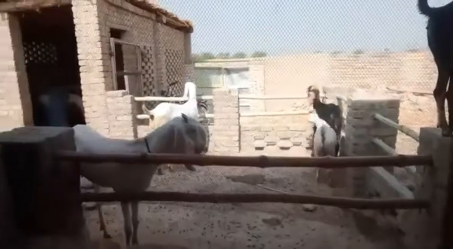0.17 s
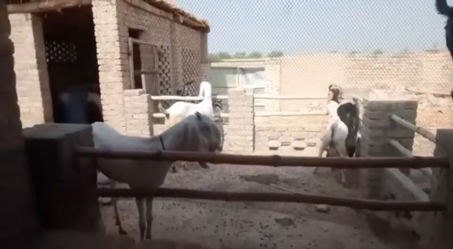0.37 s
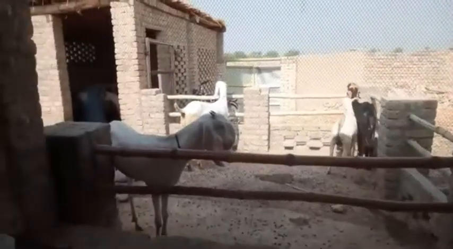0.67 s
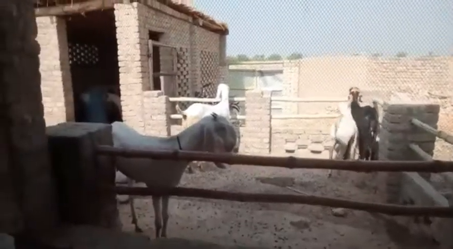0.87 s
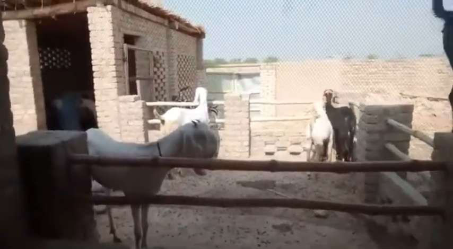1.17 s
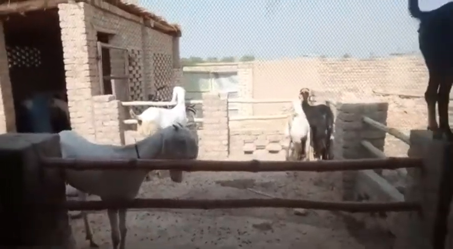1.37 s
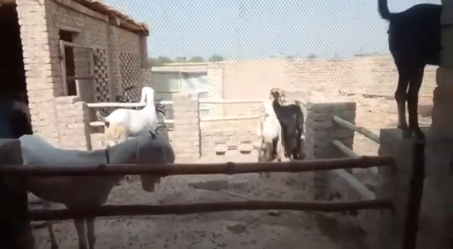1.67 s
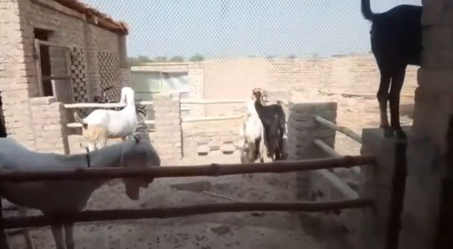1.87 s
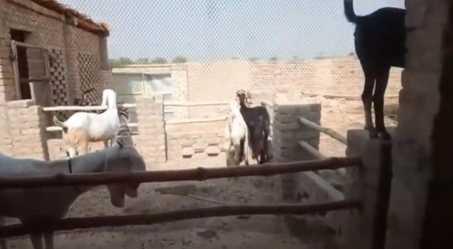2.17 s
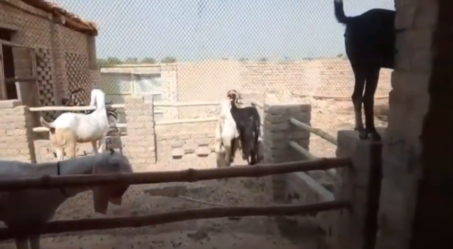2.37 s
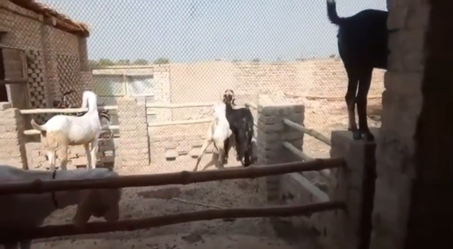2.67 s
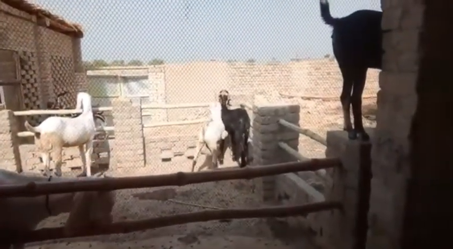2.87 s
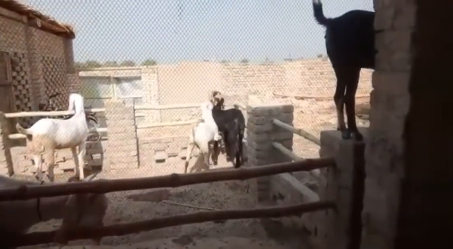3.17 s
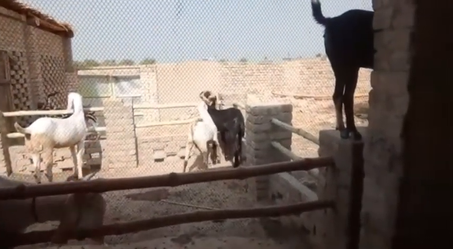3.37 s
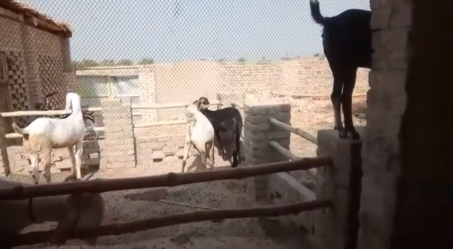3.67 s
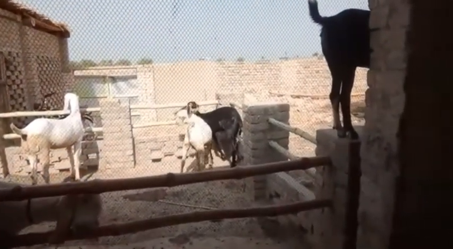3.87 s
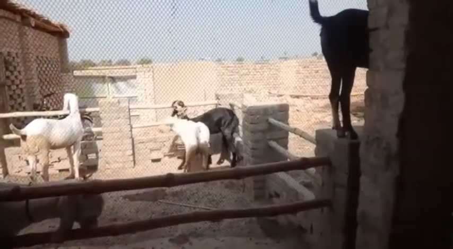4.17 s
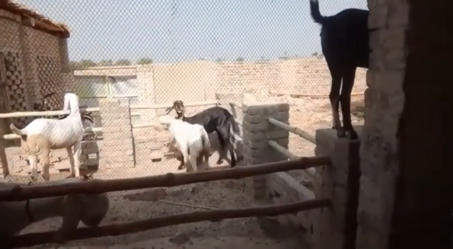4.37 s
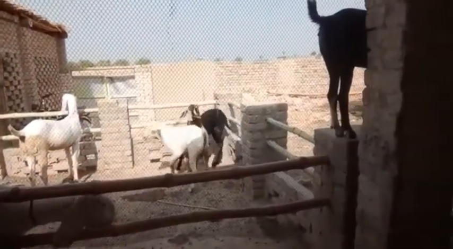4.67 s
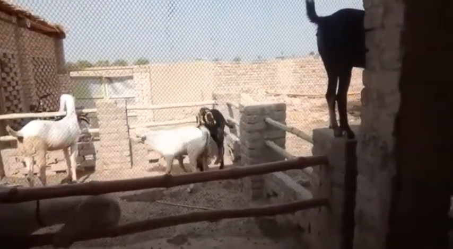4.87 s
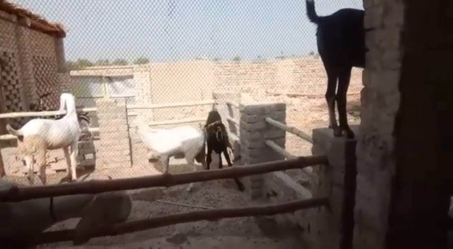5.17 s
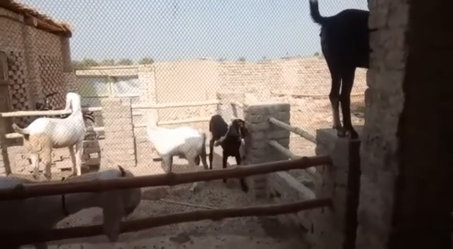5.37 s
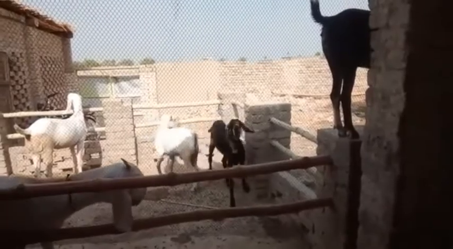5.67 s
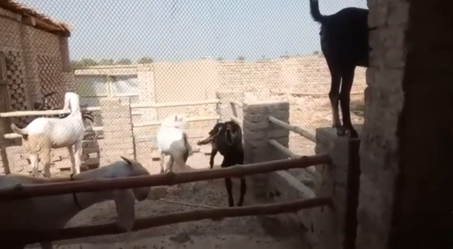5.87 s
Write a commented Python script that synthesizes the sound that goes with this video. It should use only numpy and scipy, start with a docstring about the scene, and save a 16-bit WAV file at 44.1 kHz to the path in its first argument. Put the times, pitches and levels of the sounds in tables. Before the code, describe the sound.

In a brick farm pen, one goat near the microphone bleats twice, about two seconds apart, each under a second long, rough at the edges and clearer in the middle. Distant wavering bleats come after each. Soft dirt scuffs run throughout; later, irregular gritty hoof steps grow busier, with a tiny raspy squeak among them. Quiet outdoor rumble and a faint mid-pitched ring lie behind; the small microphone is light in bass.

```python
"""The tail of an earlier bleat stops short over a scuff; then a goat near the microphone bleats twice in a brick pen.
Each call, harmonics plus rasp through a throat, starts hoarse, rises to a clear held note and breaks as it falls.
A far goat, wavering harmonics, answers faintly after each call. Hoof steps and scuffs are shaped noise on dry dirt.
Something squeaks once, as noise in narrow resonances; walls echo, and behind lie a low rumble and a faint ring."""
import sys
import numpy as np
from scipy import signal
from scipy.fft import rfft, irfft, next_fast_len
from scipy.io import wavfile
from scipy.ndimage import map_coordinates

SR = 44100
rng = np.random.default_rng(int(sys.argv[2]) if len(sys.argv) > 2 else 0)


def put_to_file(sound):
    """Save the sound as 16-bit audio at rate SR, in the file named by the first command-line argument."""
    columns = np.atleast_2d(sound).T  # one column per channel
    safe = np.clip(columns, -1, 1)
    whole_steps = np.round(safe * 32767)
    wavfile.write(sys.argv[1], SR, whole_steps.astype(np.int16))


N = 264996  # length [samples]


def amp(db):
    """Decibels to gain."""
    return 10 ** (np.asarray(db) / 20)


def unit(x):
    """Scaled to rms 1."""
    return x / np.sqrt(np.mean(x ** 2) + 1e-20)


def along(points, hz):
    """(frequency, value) points read on a log frequency axis."""
    f, v = np.transpose(points)
    return np.interp(np.log(hz + 1), np.log(f + 1), v)


def curves(rows, t):
    """Each column after the time, read at the times t."""
    s, *columns = np.transpose(rows)
    return [np.interp(t, s, column) for column in columns]


def wobble(rate, size):
    """A smooth random curve, rate knots a second."""
    knots = rng.standard_normal(int(size * rate / SR) + 4)
    return map_coordinates(knots, [np.arange(size) * rate / SR])


def delayed(x, seconds):
    """x arriving later, cut to the length of the scene."""
    return np.pad(x, (round(seconds * SR), 0))[:N]


def filtered(x, response):
    """x with its spectrum multiplied by a response of frequency."""
    m = next_fast_len(len(x) + 8192)
    return irfft(rfft(x, m) * response(np.fft.rfftfreq(m, 1 / SR)), m)[:len(x)]


def noise(spectrum, size):
    """Noise of rms 1 with the given colour."""
    return unit(filtered(rng.standard_normal(size), lambda hz: amp(along(spectrum, hz))))


def ringing(modes, size):
    """Noise of rms 1 in steep-sided resonances: (centre [Hz], width [Hz], level [dB])."""
    def body(f):
        return sum(amp(db) * np.abs(f * w / (c * c - f * f + 1j * f * w)) ** 2 for c, w, db in modes)
    return unit(filtered(rng.standard_normal(size), body))


def swept(centre_hz, width_hz):
    """Noise of rms 1 in a resonance whose centre moves: slow noise shifted up to the centre."""
    slow = filtered(rng.standard_normal(len(centre_hz)), lambda hz: 1 / (1 + (2 * hz / width_hz) ** 4))
    # the one-sided slow noise is centred about a quarter width above zero
    carrier = np.exp(2j * np.pi * np.cumsum(centre_hz - width_hz / 4) / SR)
    return unit(np.real(signal.hilbert(slow) * carrier))


# pitch of the near goat's first call, falling fast where it breaks: (time [s], pitch [Hz])
FIRST_PITCH = [(0.085, 200), (0.145, 256.9), (0.235, 299.7), (0.27, 340.8), (0.307, 369.2), (0.359, 362.8),
               (0.401, 383.8), (0.521, 396.2), (0.681, 402.6), (0.787, 392), (0.808, 335.3), (0.847, 315.3),
               (0.92, 278.4)]
# its loudness before trims: (time [s], vowel level [dB], mouth band level [dB], bright edge level [dB])
FIRST_LEVEL = [(0.085, -45, -53.5, -59), (0.122, -22, -43.8, -49.5), (0.15, -30.5, -27.5, -35),
               (0.17, -31, -43.5, -44.5), (0.2, -39, -27.5, -43.5), (0.235, -20, -25, -41.5),
               (0.285, -31.5, -30, -47.5), (0.335, -29, -35.5, -41.5), (0.44, -19.5, -27, -42),
               (0.52, -23, -29.5, -36.5), (0.6, -25, -30.5, -43.5), (0.71, -23.5, -24.5, -41.8),
               (0.77, -21, -39, -45.5), (0.805, -20.5, -34, -37.7), (0.87, -27, -35.5, -52.5),
               (0.92, -39.7, -49, -55.4)]
# two upper resonances, moved by jaw and tongue: (time [s], mouth centre [Hz], edge centre [Hz])
FIRST_MOUTH = [(.15, 2430, 4957), (.21, 2633, 4900), (.28, 2943, 3900), (.44, 3050, 5200),
               (.49, 2400, 5000), (.74, 2400, 4513), (.81, 2600, 5830)]
# low resonances of the throat, which give the vowel: (frequency [Hz], level [dB])
FIRST_VOWEL = [(200, 3.5), (300, -20), (400, -15), (500, -6), (620, 1), (760, 4.5), (885, -7), (1225, -1.5),
               (1465, -7), (1570, -1.5), (1700, -24)]
# throat and mouth above the vowel: (frequency [Hz], level [dB])
FIRST_THROAT = [(1800, -5.5), (2000, -3), (2400, 3.5), (2800, -10), (3100, 2.5), (3600, -16.5),
                (4200, -17.5), (4800, -16.5), (5600, -18), (6200, -29.5), (6700, -48), (7300, -42.5),
                (10000, -81)]


def first_bleat():
    """The first call grows much hoarser as the pitch sags, most of all in its bright edge."""
    return bleat(FIRST_PITCH, FIRST_LEVEL, FIRST_MOUTH, FIRST_VOWEL, FIRST_THROAT,
                 clear_db=-20.0, slack_db=13, jitter=.014, shimmer_db=2.5, low_rasp_db=-6, edge_rasp_db=11.5,
                 body_trim_db=-0.2, mouth_trim_db=-1.04, edge_trim_db=-1.5)


# pitch of the near goat's second call: (time [s], pitch [Hz])
SECOND_PITCH = [(2.088, 208.1), (2.156, 291.7), (2.218, 330.5), (2.231, 374.2), (2.326, 379.2),
                (2.434, 394), (2.472, 408.3), (2.483, 388.7), (2.538, 379), (2.644, 352.4), (2.678, 332.4),
                (2.711, 301.9), (2.746, 289.2), (2.8, 241.3)]
# its loudness before trims: (time [s], vowel level [dB], mouth band level [dB], bright edge level [dB])
SECOND_LEVEL = [(2.088, -36, -47.5, -51.5), (2.125, -28.5, -34.5, -47), (2.156, -19.0, -30, -27.5),
                (2.207, -15.5, -26, -28), (2.23, -27.5, -33.5, -32.5), (2.281, -21.5, -26.5, -23.5),
                (2.36, -25.5, -22, -30.5), (2.446, -22, -24, -25), (2.479, -20, -21.5, -32),
                (2.596, -29.5, -21.5, -23.5), (2.635, -26, -37, -32.5), (2.711, -14, -24.5, -38.3),
                (2.744, -23.5, -28, -32.5), (2.8, -36, -39, -53)]
# two upper resonances, moved by jaw and tongue: (time [s], mouth centre [Hz], edge centre [Hz])
SECOND_MOUTH = [(2.2, 2670, 4920), (2.278, 2790, 3980), (2.38, 3096, 4970), (2.54, 3050, 4250),
                (2.6, 2630, 4440), (2.72, 2710, 4950)]
# low resonances of the throat, which give the vowel: (frequency [Hz], level [dB])
SECOND_VOWEL = [(250, -43), (400, -23.5), (510, -16.5), (640, 2.5), (790, -20.5), (975, -25.5), (1240, -4),
                (1400, -12), (1510, -12.5), (1770, -32.5)]
# throat and mouth above the vowel: (frequency [Hz], level [dB])
SECOND_THROAT = [(1750, -6.5), (1920, -2.5), (2120, -12), (2620, 1.5), (2880, -9.5), (3100, -0.5),
                 (3420, -7.5), (3750, 0.5), (4100, 5.5), (4450, -3), (5000, 1), (6100, -20), (6600, -35),
                 (10000, -66.5)]


def second_bleat():
    """The second call has more rasp at its clearest, but its hoarseness depends less on pitch."""
    return bleat(SECOND_PITCH, SECOND_LEVEL, SECOND_MOUTH, SECOND_VOWEL, SECOND_THROAT,
                 clear_db=-17, slack_db=3, jitter=0.01, shimmer_db=3.5, low_rasp_db=-5.5, edge_rasp_db=3,
                 body_trim_db=0.5, mouth_trim_db=-1.0, edge_trim_db=-1.5)


# resonances that the rasp rings in the vowel band: (centre [Hz], width [Hz], level [dB])
RASP_RESONANCES = [(650, 260, -6), (1295, 200, 6)]
VOWEL_TOP_HZ, EDGE_FROM_HZ = 1750, 3620  # borders of vowel, mouth band and edge
QUAVER = .004  # slow pitch quaver, as a share of the pitch
FRAY_DB, FRAY_FROM_HZ = 4.5, 1300  # fast shiver of the harmonics; those below this frequency stay smoother
CROAK_DB = 3  # uneven force of the closures, for each unit of rasp
UNEVEN = 0.44  # how much strong and weak closures differ, for each unit of rasp
FOCUS_DB = 6  # lift of a harmonic inside a moving resonance
RASP_PEAK_DB, RASP_PEAK_HZ = 0.5, 895  # level and width of the rasp inside a moving resonance


def bleat(pitch_rows, level_rows, mouth_rows, vowel, throat, clear_db, slack_db, jitter, shimmer_db,
          low_rasp_db, edge_rasp_db, body_trim_db, mouth_trim_db, edge_trim_db):
    """The vocal folds sound a stack of harmonics; when they flap unevenly, puffs of rasp ring the same throat."""
    start, end = pitch_rows[0][0], pitch_rows[-1][0]
    t = np.arange(round(start * SR), round(end * SR)) / SR
    size = len(t)
    pitch, = curves(pitch_rows, t)
    body_db, mouth_db, edge_db = curves(level_rows, t)
    mouth_hz, edge_hz = curves(mouth_rows, t)
    rasp = hoarseness(t, pitch, clear_db, slack_db)

    # the pitch quavers slowly, and trembles faster where the voice is hoarse
    pitch = pitch * (1 + QUAVER * wobble(60, size) + jitter * rasp * wobble(260, size))
    phase = 2 * np.pi * np.cumsum(pitch) / SR
    orders = np.arange(1, 31)[:, None]
    harmonic_hz = orders * pitch

    restless = np.minimum(harmonic_hz / FRAY_FROM_HZ, 1)
    flutter = amp(shimmer_db * restless * np.array([wobble(28, size) for _ in orders]))
    # each harmonic also shivers fast, which frays its line
    fray = np.sqrt(np.minimum(rasp, .5)) * restless
    flutter *= amp(FRAY_DB * fray * np.array([wobble(130, size) for _ in orders]))
    # the throat delays the low harmonics, so each closure of the folds is a short chirp
    harmonics = np.cos(orders * phase - 4 * np.pi * np.sqrt(orders))
    stack = np.sqrt(2) * unit(flutter) * harmonics
    puffs = unit(1 + .85 * np.cos(phase - np.pi / 2))  # one puff of air a cycle

    # the harmonics glide through the vowel, the mouth band and a bright, breathy edge
    def below(hz, limit):
        return 1 / (1 + (hz / limit) ** 50)

    def low(hz):
        return amp(along(vowel, hz)) * below(hz, VOWEL_TOP_HZ)

    def mouth(hz):
        return amp(along(throat, hz)) * (below(hz, EDGE_FROM_HZ) - below(hz, VOWEL_TOP_HZ))

    def edge(hz):
        return amp(along(throat, hz)) * (1 - below(hz, EDGE_FROM_HZ))

    def air(colour, centre_hz):
        still = unit(filtered(rng.standard_normal(size), colour))
        return unit(still + amp(RASP_PEAK_DB) * swept(centre_hz, RASP_PEAK_HZ))

    bands = [(low, body_db + body_trim_db, rasp * amp(low_rasp_db), ringing(RASP_RESONANCES, size)),
             (mouth, mouth_db + mouth_trim_db, rasp, air(mouth, mouth_hz)),
             (edge, edge_db + edge_trim_db, rasp * amp(edge_rasp_db), air(edge, edge_hz))]
    nearness = sum(np.exp(-(np.log(harmonic_hz / centre) / 0.047) ** 2) for centre in (mouth_hz, edge_hz))
    focus = amp(FOCUS_DB * nearness)
    voice = np.zeros(size)
    for colour, level_db, hoarse, hiss in bands:
        gains = colour(harmonic_hz) * focus
        tone = np.sum(gains * stack, axis=0) / (np.linalg.norm(gains, axis=0) + 1e-9)
        # more rasp leaves less tone, so the loudness holds
        voice += amp(level_db) * (tone + hoarse * puffs * hiss) / np.hypot(1, hoarse)

    # hoarse vocal folds close with uneven force, which makes the whole voice croak
    voice *= unit(amp(CROAK_DB * np.minimum(rasp, .7) * wobble(200, size)))
    # every other closure is at times weaker, which growls between the harmonics
    voice *= unit(1 + UNEVEN * np.minimum(rasp, .5) * wobble(40, size) * np.cos(phase / 2))
    fade = np.clip((t - start) / 0.0013, 0, 1) * np.clip((end - t) / 0.022, 0, 1)
    return np.pad(voice * fade, (round(start * SR), N))[:N]


# cracks, where the voice turns hoarse for a moment: (time [s], half length [s], extra rasp [dB])
VOICE_CRACKS = [(.135, .05, 13.5), (.28, .025, 8.5), (0.442, .03, 3.5), (0.514, 0.033, 11.5),
                (0.825, .03, 5.5), (0.898, 0.034, 8), (2.234, 0.018, 7.5), (2.383, 0.04, 10),
                (2.498, 0.027, 5), (2.779, .03, 11)]
CLEAR_HZ = 413.6  # reference pitch of the clear voice; below it the rasp grows


def hoarseness(t, pitch, clear_db, slack_db, max_db=-3.5):
    """Rasp over tone: it grows by slack_db for each octave that the pitch sags, and flares in the cracks."""
    cracks_db = sum(db * np.exp(-((t - s) / width) ** 2) for s, width, db in VOICE_CRACKS)
    sag_octaves = np.log2(CLEAR_HZ / pitch)
    return amp(np.minimum(clear_db + slack_db * sag_octaves + cracks_db, max_db))


# partials in the fading end of an earlier bleat: (frequency [Hz], level before a common lift [dB])
EARLIER_PARTIALS = [(810, -44.5), (1465, -38), (1625, -38.5), (2412, -56), (3171, -49)]


def earlier_bleat(t):
    """The last of a bleat, a few sines of trembling phase, stops short."""
    partials = sum(amp(db) * np.sin(2 * np.pi * hz * t + .7 * wobble(90, N)) for hz, db in EARLIER_PARTIALS)
    return partials * amp(4.0) * np.exp(-(t / 0.024) ** 2)


# posts and walls near by: (delay [s], level [dB])
NEAR_ECHOES = [(.0061, -12.5), (0.01, -13), (0.0147, -13.5), (0.0245, -17.5), (0.0356, -12.5)]


def near_walls(x):
    """Early echoes: on a glide they return an older pitch and beat with the high harmonics."""
    echoes = sum(amp(db) * delayed(x, delay) for delay, db in NEAR_ECHOES)
    colour = [(700, -15), (1600, -7.5), (2500, -3.5), (4500, 1)]  # (frequency [Hz], level [dB])
    return filtered(echoes, lambda hz: amp(along(colour, hz)))


# colour of the echo from the end of the yard: (frequency [Hz], level [dB])
BACK_WALL_COLOUR = [(600, -40.5), (900, -29), (1200, -15.5), (1600, -29), (5000, -36)]


def back_wall(x):
    """One late, hollow echo: the wall returns mainly a band around 1200 Hz."""
    return filtered(delayed(x, 0.077), lambda hz: amp(along(BACK_WALL_COLOUR, hz)))


# colour of the gritty dirt: (frequency [Hz], level [dB])
GRIT_COLOUR = [(600, -38), (1000, -24), (1240, 4.5), (1450, -11), (1750, -13), (2000, -2), (3000, -0.5),
               (4800, -1.5), (5500, 0.5), (6200, -6.5), (6700, -14.5), (8000, -29.5), (11000, -46.5)]
# colour of the dull shuffle: (frequency [Hz], level [dB])
SHUFFLE_COLOUR = [(100, -21.5), (180, -3), (280, -5.5), (400, -3), (520, -4.5), (800, -9), (1200, -10.5),
                  (1800, -7.5), (3500, -49.5)]
# hoof steps, levels before common trims: (time [s], crunch level [dB], thud level [dB], crunch t60 [s])
HOOF_STEPS = [(3.259, -46, -66.5, 0.13), (3.9515, -43.5, -61, 0.062), (4.1681, -34, -53, 0.084),
              (4.3242, -38, -56.5, 0.1), (4.345, -38.5, -73, 0.081), (4.5229, -42, -56, 0.18),
              (4.796, -35, -54, 0.058), (4.864, -42.5, -74, 0.046), (4.9012, -37.5, -57.5, 0.062),
              (4.9582, -35, -56.5, 0.027), (5.1446, -44, -52, 0.12), (5.5468, -41, -47.5, 0.058),
              (5.671, -32, -54, 0.052), (5.7184, -36, -55.5, 0.08)]


def steps():
    """Each hoof gives a gritty crunch and a dull thud in the dirt, both decaying noise."""
    out, t = np.zeros(N + SR), np.arange(SR // 4) / SR
    attack = 1 - np.exp(-t / 0.00081)
    for s, crunch_db, thud_db, t60 in HOOF_STEPS:
        crunch = amp(crunch_db - 6.5 - 60 * t / t60) * noise(GRIT_COLOUR, len(t))
        thud = amp(thud_db + 2 - 60 * t / 0.14) * noise(SHUFFLE_COLOUR, len(t))
        out[round(s * SR):][:len(t)] += (crunch + thud) * attack
    return out[:N]


# resonances of the squeak: (centre [Hz], width [Hz], level [dB])
SQUEAK_RESONANCES = [(2353, 23, -2), (2830, 50, -2.5), (3136, 43, 2.5), (4040, 130, -9.5),
                     (4700, 160, -16.5)]
# its loudness: (time [s], level [dB])
SQUEAK_LOUDNESS = [(4.99, -81.5), (5.005, -51), (5.02, -42.5), (5.037, -46), (5.048, -63), (5.065, -49),
                   (5.12, -55), (5.16, -80.5)]


def squeak(t):
    """A short raspy squeak: noise in narrow resonances."""
    level_db, = curves(SQUEAK_LOUDNESS, t)
    return amp(level_db) * ringing(SQUEAK_RESONANCES, N)


# reverberation of the brick pen: (frequency [Hz], t60 [s])
PEN_DECAY = [(200, 0.47), (600, .22), (1200, 0.34), (3000, 0.072), (7000, 0.048)]


def pen(x):
    """The brick walls answer with a noise tail; each frequency dies at its own speed."""
    hz, t, z = signal.stft(rng.standard_normal(SR // 2), SR, nperseg=256)
    decay = amp(-60 * t / along(PEN_DECAY, hz)[:, None])
    tail = signal.istft(z * decay, SR, nperseg=256)[1]
    tail = np.pad(tail / np.linalg.norm(tail), (round(.008 * SR), 0))
    return signal.fftconvolve(x, tail)[:N]


# the far goat's calls: (start [s], length [s], top pitch [Hz], level before a common trim [dB])
FAR_BLEATS = [(1.253, .42, 421.2, -65), (3.294, .52, 424.5, -68)]
# the far goat's harmonics: (multiple of the pitch, level [dB])
FAR_HARMONICS = [(2, -3), (3, -2.5), (4, 0.5), (5, -9.5), (6, -14), (7, -2), (8, -8), (12, -15), (13, -22)]
FAR_SAG, FAR_FADE_S = 0.088, 0.072  # share by which the pitch droops at both ends; fade in and out


def far_goat(t):
    """Distant bleats: arched notes whose harmonics waver and smear on their way across the yard."""
    out = np.zeros(N)
    for s, length, top_hz, level_db in FAR_BLEATS:
        arch = np.clip(2 * (t - s) / length - 1, -1, 1) ** 2
        pitch = top_hz * (1 - FAR_SAG * arch)
        phase = 2 * np.pi * np.cumsum(pitch * (1 + .011 * wobble(22, N))) / SR
        stack = np.zeros(N)
        for multiple, db in FAR_HARMONICS:
            level = amp(db + 3 * wobble(16, N))
            stack += level * np.sin(round(multiple) * phase + 1.25 * wobble(80, N))
        fade = np.clip(np.minimum(t - s, s + length - t) / FAR_FADE_S, 0, 1)
        out += amp(level_db) * stack * fade
    return amp(-3) * (out + pen(out))


# scuffs and drags in the dirt: (start [s], length [s], grit level [dB], dull shuffle level [dB])
DIRT_SCUFFS = [(0, 0.26, -52, -49.5), (0.916, 0.11, -55.5, -56), (1.02, 0.13, -48.5, -51),
               (1.53, 0.23, -55, -58.5), (1.693, 0.23, -50, -55), (1.925, 0.089, -56, -63.5),
               (2.805, 0.12, -54.5, -57.5), (2.952, 0.12, -57.5, -64), (3.234, 0.11, -58, -62),
               (3.44, .14, -62, -85), (3.854, .06, -61.5, -72), (3.966, 0.29, -57, -61),
               (4.32, 0.58, -59.5, -66), (4.875, 0.14, -54, -66), (5.026, 0.48, -55.5, -64.5),
               (5.545, 0.266, -55.5, -64.5), (5.791, 0.18, -60, -65)]
SCUFF_ATTACK_S, SCUFF_RELEASE_S = .022, 0.054  # linear rise; time constant of the fall
STILL_GRIT_DB, STILL_SHUFFLE_DB = -68.5, -70.5  # the dirt when nothing moves


def scuffs(t):
    """Drags in the dirt: each rises, holds and dies away as grit over a dull shuffle."""
    grit_level, shuffle_level = amp(STILL_GRIT_DB), amp(STILL_SHUFFLE_DB)
    for s, length, grit_db, shuffle_db in DIRT_SCUFFS:
        rise = np.clip((t - s) / SCUFF_ATTACK_S, 0, 1)
        stroke = rise * np.exp(-np.maximum(t - s - length, 0) / SCUFF_RELEASE_S)
        grit_level = np.maximum(grit_level, amp(grit_db) * stroke)
        shuffle_level = np.maximum(shuffle_level, amp(shuffle_db) * stroke)
    shuffle = shuffle_level * amp(0.73 * wobble(25, N)) * noise(SHUFFLE_COLOUR, N)
    grains = unit(amp(2.2 * wobble(900, N) + 0.97 * wobble(35, N)))
    grit = grit_level * amp(1.9 * wobble(29, N)) * grains * noise(GRIT_COLOUR, N)
    return shuffle + grit


def low_bump(t):
    """One soft low bump: a brief swell of noise around 75 Hz."""
    return amp(-47.5) * np.exp(-((t - 3.735) / 0.03) ** 2) * ringing([(75, 32, 0)], N)


# colour of the yard's low rumble: (frequency [Hz], level [dB])
RUMBLE_COLOUR = [(15, -50.5), (25, -21.5), (53, -3), (92, 2.5), (141, 4), (190, -5), (221, -7.5),
                 (400, -17.5), (520, -40.5), (880, -120)]
RUMBLE_DB = -65  # early level
STIR_S, STIR_DB = 3.7, 2  # from this time on the rumble is this much louder


def rumble(t):
    """Low outdoor noise whose level drifts, and steps up late in the scene."""
    return amp(RUMBLE_DB + STIR_DB * (t > STIR_S) + 1.8 * wobble(12, N)) * noise(RUMBLE_COLOUR, N)


def faint_ring(t):
    """A faint narrow ring, noise around 1260 Hz, hangs in the background."""
    return amp(-72.5 + 2.3 * wobble(8.4, N)) * ringing([(1260, 72, 0)], N)


def scene():
    """The calling goat near by, the herd and the yard behind it."""
    t = np.arange(N) / SR
    goat = first_bleat() + second_bleat()
    near = goat + near_walls(goat) + back_wall(goat) + steps() + squeak(t)
    near_in_pen = near + amp(-11.5) * pen(near)
    yard = scuffs(t) + low_bump(t) + rumble(t) + faint_ring(t)
    return (near_in_pen + earlier_bleat(t) + far_goat(t) + yard)[None]


def record(dry):
    """A small microphone, a little weaker in the bass, with a trace of hiss and a steep band limit."""
    colour = [(20, -4.0), (5800, 0.5), (6600, 1.5), (8000, 0.5), (12000, 2)]  # (frequency [Hz], level [dB])
    heard = filtered(dry[0], lambda hz: amp(along(colour, hz)))
    heard = heard + amp(-84.5) * rng.standard_normal(N)
    return filtered(heard, lambda hz: hz < 15600)[None]


dry = scene()
out = record(dry)
put_to_file(out)
```